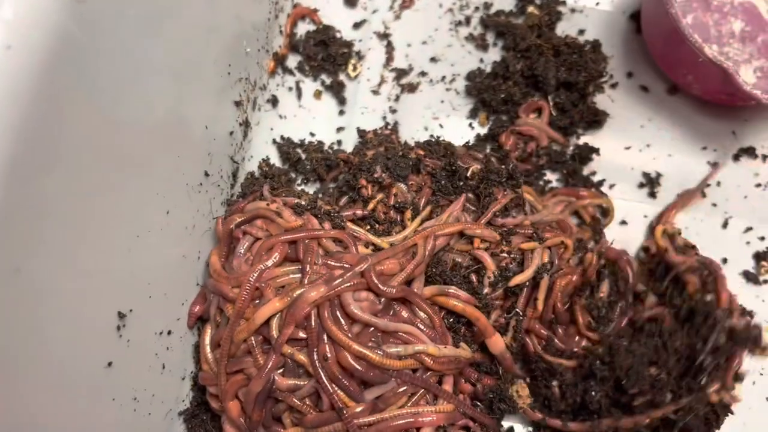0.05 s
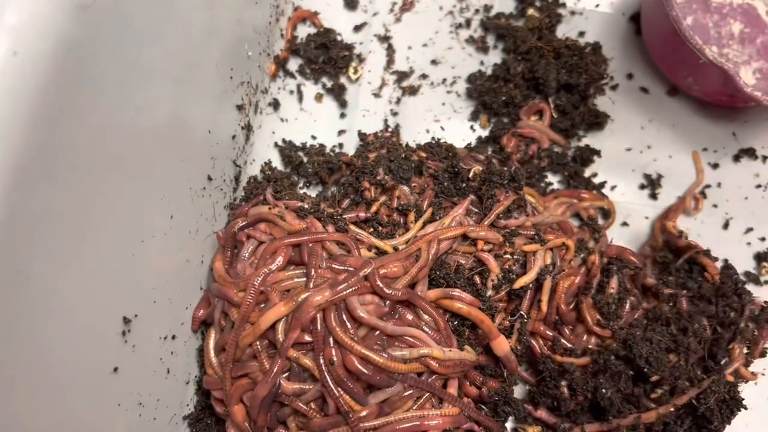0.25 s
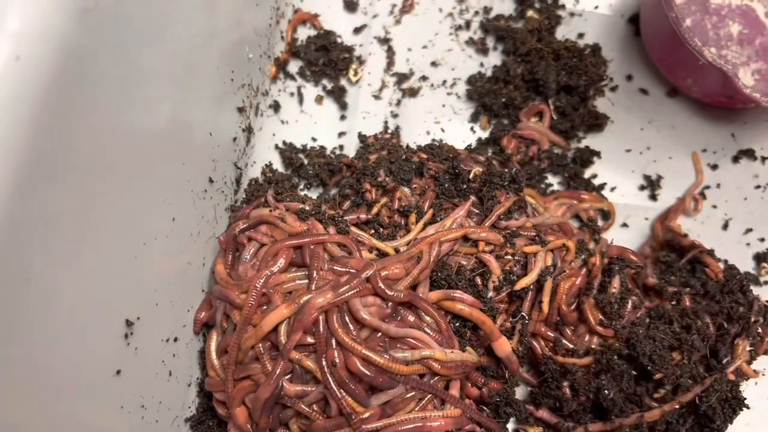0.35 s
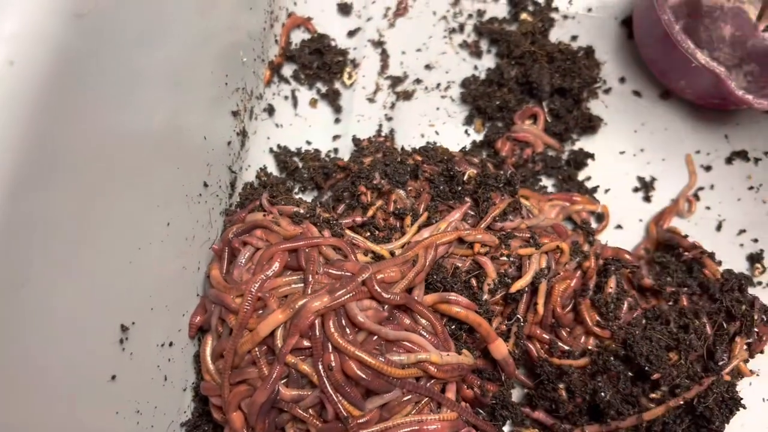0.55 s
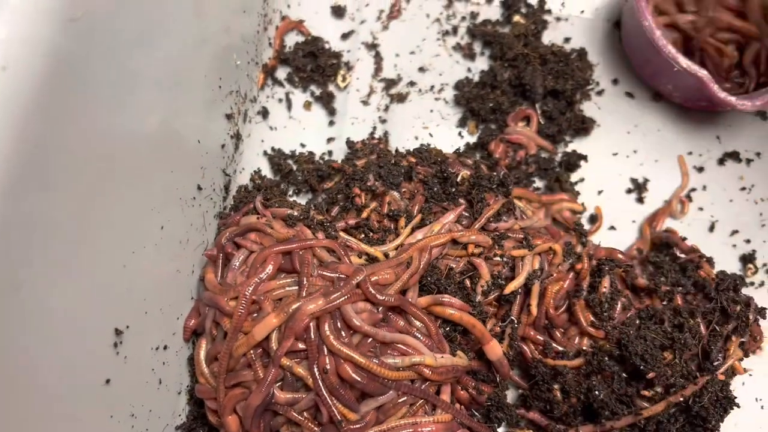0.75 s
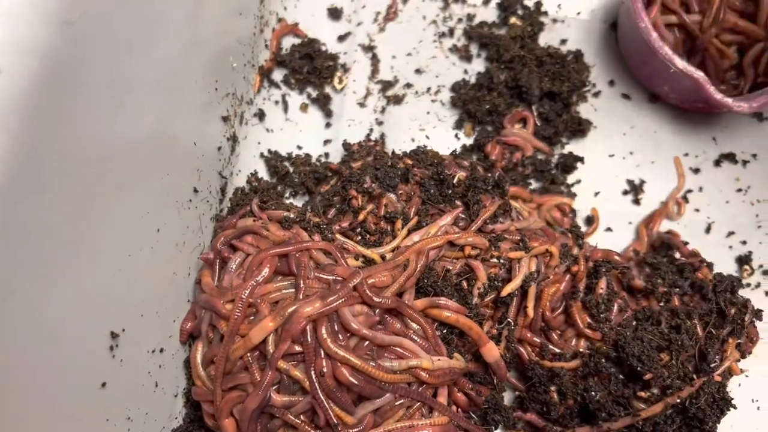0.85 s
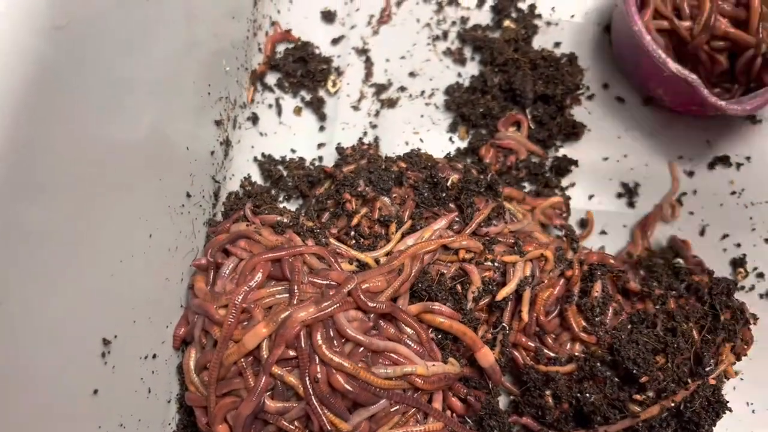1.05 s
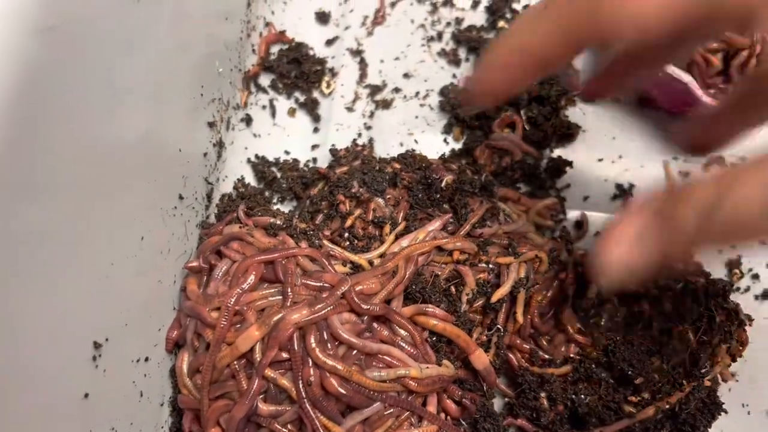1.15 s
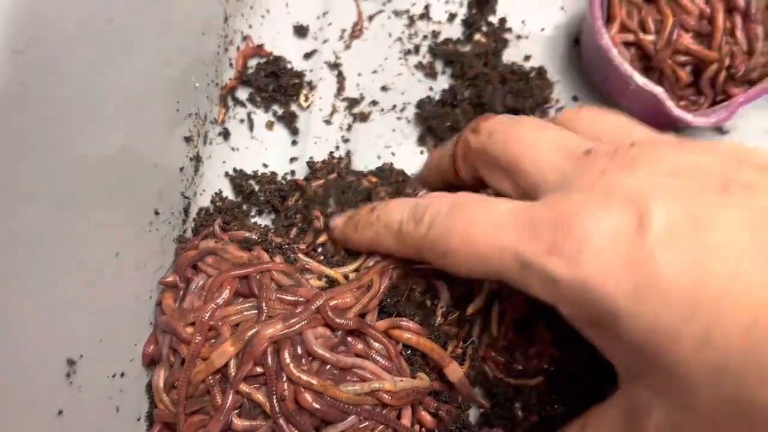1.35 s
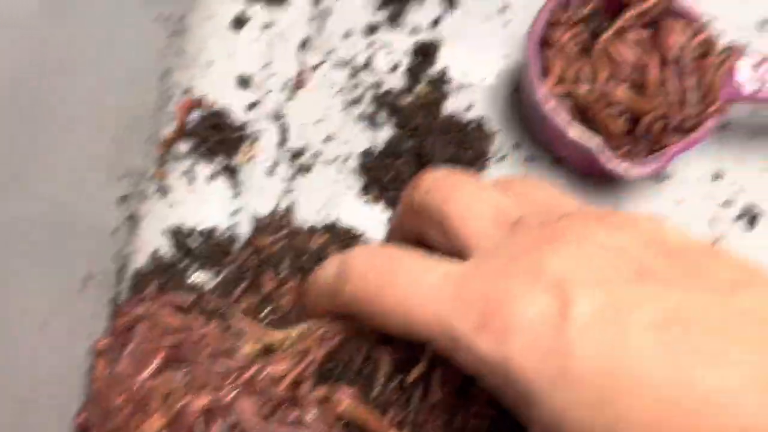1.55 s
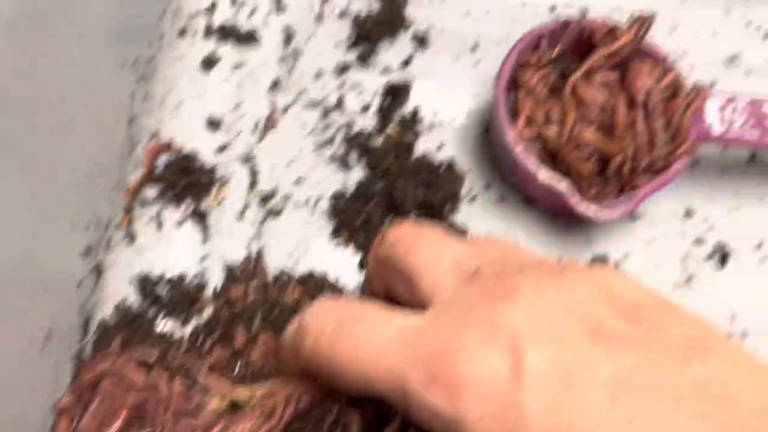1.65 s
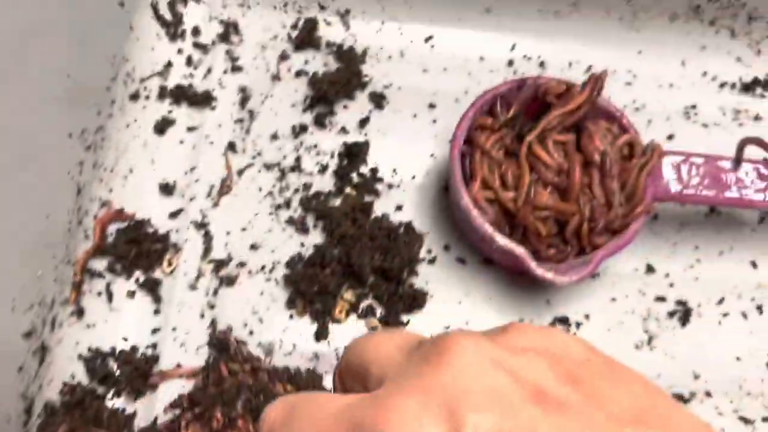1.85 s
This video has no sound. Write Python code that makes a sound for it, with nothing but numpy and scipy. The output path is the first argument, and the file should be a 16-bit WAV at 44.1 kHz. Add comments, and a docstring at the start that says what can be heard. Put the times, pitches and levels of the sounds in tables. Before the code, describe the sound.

Close up in a quiet room, damp clumps thud softly on a plastic tub floor while a scoop clicks and is set down. A hand then presses into worms and bedding, making faint rustles, tiny ticks and a brief squelch.

```python
"""Soft thuds and sharp clicks, then rustling, wet ticks and one rising squelch, close by in a quiet room.
Clumps of worms and damp coir (coconut fibre) drop into a plastic tub and make its floor thud and ring.
A plastic scoop clicks and is set down. Then a hand presses into the pile: the bedding rustles,
wet strands tick as they part, and one pinch squeezes a wet pocket shut, so that its pitch rises."""
import sys
import numpy as np
from scipy import signal
from scipy.fft import rfft, irfft
from scipy.io import wavfile
from scipy.ndimage import uniform_filter1d

SR = 44100
rng = np.random.default_rng(int(sys.argv[2]) if len(sys.argv) > 2 else 0)


def to_wav(s):
    """Save 16-bit WAV."""
    ch = np.atleast_2d(s).T  # columns
    pcm = np.round(np.clip(ch, -1, 1) * 32767)  # PCM
    wavfile.write(sys.argv[1], SR, pcm.astype(np.int16))


N = 83790
TIME, BIN_HZ = np.arange(N) / SR, np.maximum(np.arange(N // 2 + 1) * SR / N, 1)
# tone colour of the high crackle, with two narrow dips in the treble: f/Hz, level/dB
CRACKLE_SPECTRUM = [(2500, -14), (4000, -6.5), (6500, -4.5), (8600, 2.5), (10200, -17.5), (12200, -2),
                    (13800, -19), (15300, -5), (16500, -16)]


def from_db(db):
    """Turn decibels into a factor to multiply by."""
    return 10 ** (np.asarray(db) / 20)


def rms_one(x):
    """Scale a signal so that its average strength (rms) is 1."""
    return x / np.sqrt(np.mean(x ** 2) + 1e-20)


def panned(x, db):
    """Make the left side db decibels louder than the right."""
    return x * from_db([[db / 2], [-db / 2]])


def add(out, start_s, x):
    """Mix x into out, beginning at start_s."""
    i = max(int(start_s * SR), 0)
    out[..., i:i + x.shape[-1]] += x[..., :max(N - i, 0)]


def curve_at(points, hz):
    """Read between a table's points, with the frequencies spaced by octaves."""
    freqs, values = np.transpose(points)
    return np.interp(np.log(hz), np.log(freqs), values)


def coloured(x, spectrum):
    """Give a signal a tone colour; its rms comes out as 1."""
    return rms_one(irfft(rfft(x) * from_db(curve_at(spectrum, BIN_HZ)), N))


def stereo_noise(side_db):
    """White noise; the higher side_db, the wider it sounds."""
    mid, side = rng.standard_normal((2, N))
    return rms_one(mid + from_db(side_db) * side * [[1], [-1]])


def flicker(per_s, depth_db):
    """A gain that glides to a new random level per_s times a second."""
    return from_db(depth_db * np.interp(TIME * per_s, np.arange(N), rng.standard_normal(N)))


def tap_response(spectrum_db):
    """The shortest sound with this spectrum that can follow a tap (minimum phase)."""
    cepstrum = irfft(spectrum_db * np.log(10) / 20)
    half = len(cepstrum) // 2
    cepstrum[1:half] *= 2
    cepstrum[half + 1:] = 0
    return irfft(np.exp(rfft(cepstrum)))


def resonance(hz, width_hz):
    """A filter that rings at one pitch, with gain 1 at its peak."""
    r = np.exp(-np.pi * width_hz / SR)
    return (1 - r * r) / 2 * np.array([1, 0, -1]), [1, -2 * r * np.cos(2 * np.pi * hz / SR), r * r]


def ringing(x, modes):
    """x sets a body's own tones (modes) ringing; each takes t60 seconds to fade by 60 dB."""
    return sum(from_db(db) * signal.lfilter(*resonance(hz, np.log(1000) / np.pi / t60), x + 1e-18)
               for hz, db, t60 in modes)


def hump_db(hz, centre_hz, width_oct):
    """A rounded hill in the spectrum around one frequency."""
    return -10 * np.log10(1 + (np.log2(hz / centre_hz) / width_oct) ** 4)


def burst(db, spectrum_db, envelope):
    """Many tiny contacts blur into one click; db sets its loudest half millisecond."""
    contacts = rng.standard_normal(len(envelope)) * envelope
    click = signal.fftconvolve(contacts, tap_response(spectrum_db))
    return click * from_db(db) / np.sqrt(2 * uniform_filter1d(click ** 2, size=22).max())


def room_echo(x, t60=0.27):
    """The room's reflections make a short tail, different in each ear."""
    t = TIME[:SR // 2]
    tail = rng.standard_normal((2, len(t))) * from_db(-60 * t / t60) * (t > .005)
    tail /= np.sqrt(np.sum(tail ** 2) / 2)
    return signal.fftconvolve(np.atleast_2d(x), tail, axes=1)[:, :N]


def out_of_step(x):
    """Left and right are set out of step with each other, most in the mids and treble."""
    # how far the left side leads the right: f/Hz, phase/rad
    phase_lead = [(60, .15), (380, .35), (700, 1.0), (1200, 2.3), (2400, 1.5), (4400, 1.15), (15000, 1.4)]
    return irfft(rfft(x) * np.exp(.5j * curve_at(phase_lead, BIN_HZ) * [[1], [-1]]), N)


def quiet_room():
    """A faint, steady rumble lies under everything."""
    # tone colour of the rumble: f/Hz, level/dB
    spectrum = [(20, -12.5), (52, 5.5), (90, -1.5), (200, -7), (450, -17.5), (1000, -21.5), (3000, -27),
                (8000, -31.5), (16000, -63)]
    return from_db(-71.5) * coloured(stereo_noise(side_db=-9.5), spectrum)


def hand_press(peak_s=1.338, width_s=0.015, hz=56):
    """The hand's weight flexes the tub floor in one low swell."""
    swell = np.exp(-((TIME - peak_s) / width_s) ** 2)
    return from_db(-48.5) * swell * np.sin(2 * np.pi * hz * TIME)


def finger_brush(peak_s=1.742, width_s=0.048):
    """Fingers brush through the fibres with a soft swell of hiss."""
    # tone colour of the brushing: f/Hz, level/dB
    spectrum = [(1500, -25), (2600, 1.5), (3400, 4), (4300, -4), (7000, -41)]
    swell = np.exp(-((TIME - peak_s) / width_s) ** 2)
    return from_db(-58.5) * swell * coloured(stereo_noise(side_db=-3), spectrum)


def crumb_pops(pitch_count=12, base_per_s=600, spread_db=11.5, sharpness=12):
    """Moist crumbs pop in loose clusters, each at one of a set of high pitches."""
    sizes = from_db(spread_db * np.minimum(rng.exponential(1, N), 2.5)) * rng.choice([-1, 1], N)
    chance = flicker(per_s=110, depth_db=4) * base_per_s / SR
    kicks = sizes * (rng.random(N) < chance)
    kicks = kicks * from_db(rng.normal(0, 1.923, N) * [[1], [-1]])  # scatter left and right
    pitch_index = rng.integers(0, pitch_count, N)
    pops = sum(signal.lfilter(*resonance(hz, hz / sharpness), kicks * (pitch_index == k) + 1e-18)
               for k, hz in enumerate(np.geomspace(2500, 15000, pitch_count)))
    return coloured(pops, CRACKLE_SPECTRUM)


def bedding_rustle():
    """Crumbs crackle, fibres grip and rub, and the pile shifts with a muffled sound."""
    # course of the rustle: t/s, crackle level/dB, rubbing level/dB, shifting level/dB
    levels = [(0, -77, -74.5, -72.5), (.16, -75, -72, -74.5), (.38, -70, -67.5, -52),
              (0.539, -68, -80.5, -63.5), (.58, -65.5, -69, -69), (0.642, -68, -69, -61.5),
              (0.702, -54.5, -48.5, -36), (0.757, -73.5, -58, -58), (.83, -79, -71.5, -48),
              (.95, -81, -81, -76.5), (1.229, -79, -75, -78), (1.25, -76.5, -67, -53),
              (1.43, -70.5, -69, -68), (1.62, -70, -61, -76), (1.75, -60, -59.5, -61.5),
              (1.81, -63, -60.5, -72), (1.85, -65.5, -56, -71), (1.9, -57.5, -56.5, -69)]
    # tone colours of the rubbing and the shifting: f/Hz, level/dB
    rub_spectrum = [(300, 11), (600, 9), (900, 12.5), (1250, 2.5), (1700, 7.5), (2400, -1), (3300, 0),
                    (5000, -6), (9000, -49)]
    shift_spectrum = [(30, -4.5), (60, 0.5), (130, 8.5), (200, -5.5), (310, 8.5), (500, -19.5), (800, -26),
                      (1500, -52), (4000, -68)]
    times, *columns = np.transpose(levels)
    treble, mids, lows = [from_db(np.interp(TIME, times, column)) for column in columns]
    crackle = from_db(-3) * crumb_pops()
    crackle += from_db(-1) * coloured(stereo_noise(side_db=-1.5), CRACKLE_SPECTRUM)
    grip = rms_one(flicker(per_s=130, depth_db=3.5))
    rubbing = grip * coloured(stereo_noise(side_db=-4.5), rub_spectrum)
    shifting = coloured(stereo_noise(side_db=-19.5), shift_spectrum)
    return treble * crackle + mids * rubbing + lows * shifting


def squelch(block=64):
    """Uneven wet slips rasp and ring a pocket, whose pitch rises as it is squeezed shut."""
    # course of the pinch: t/s, pocket f/Hz, resonance width/Hz, pocket level/dB, rasp level/dB
    pinch = [(1.509, 835, 350, -85, -97), (1.512, 800, 243, -59, -84), (1.543, 825, 267, -53, -86),
             (1.551, 1110, 596, -69, -82), (1.561, 1560, 402, -61.5, -70), (1.572, 1580, 200, -48.5, -66),
             (1.581, 2074, 50, -53, -48.5), (1.592, 2128, 30, -49, -53), (1.618, 2110, 30, -54.5, -67),
             (1.644, 2100, 50, -76, -77)]
    # tone colour of the rasp: f/Hz, level/dB
    rasp_spectrum = [(1000, -57), (1600, 16), (2400, -35), (2700, 18), (3300, 2), (4500, 0), (8000, -30)]
    times, *columns = np.transpose(pinch)
    hz, width_hz, pocket_db, rasp_db = [np.interp(TIME, times, column) for column in columns]
    slips = rms_one(flicker(per_s=250, depth_db=2.5)) * stereo_noise(side_db=-4)
    pocket, state = np.zeros((2, N)), np.zeros((2, 2))
    for i in range(int(times[0] * SR), int(times[-1] * SR), block):
        drive = slips[:, i:i + block] * np.sqrt(SR / np.pi / width_hz[i])  # equally strong at any width
        pocket[:, i:i + block], state = signal.lfilter(*resonance(hz[i], width_hz[i]), drive, zi=state)
    pinching = (TIME > times[0]) & (TIME < times[-1])
    rasp = from_db(rasp_db) * coloured(slips, rasp_spectrum) * pinching
    return panned(pocket * from_db(pocket_db) + rasp, db=2.5)


def wet_ticks(t60=.006):
    """Wet strands part with tiny, high ticks."""
    # strands parting: t/s, level/dB, brightest f/Hz
    partings = [(.0408, -53.5, 8100), (.136, -60, 4240), (.181, -66, 7900), (0.245, -47.5, 7300),
                (.285, -49, 7600), (0.321, -47, 7800), (0.3708, -44.5, 6560), (0.393, -79, 7450),
                (0.41, -41.5, 6440), (.415, -105, 5500), (0.475, -42, 10200), (0.5523, -35, 9000),
                (.6928, -68, 8900), (0.707, -44.5, 12200), (0.7309, -54, 8550), (0.744, -63, 8550),
                (0.864, -70, 8000), (0.9197, -55, 8160), (1.036, -58, 7800), (1.065, -55.5, 5400),
                (1.427, -49, 10900), (1.514, -76, 10000), (1.6616, -33.5, 14200), (1.672, -46, 8000),
                (1.78, -40.5, 8550), (1.8079, -44.5, 8400), (1.865, -37.5, 9000)]
    hz = np.maximum(np.fft.rfftfreq(1024, 1 / SR), 1)
    fade = from_db(-60 * TIME[:SR // 10] / t60)
    ticks = np.zeros((2, N))
    for start_s, db, bright_hz in partings:
        tick = burst(db, hump_db(hz, bright_hz, width_oct=.3), fade)
        add(ticks, start_s, panned(tick, db=.7))
    return ticks


def scoop_knocks(tail_db=-25, tail_t60=0.092):
    """The hard plastic scoop clicks at each contact and rings briefly."""
    # contacts: t/s, level/dB, emphasis f/Hz, emphasis width/octaves, t60/s, pan/dB
    contacts = [(0.018, -53, 1300, 0.59, 0.06, 9.5), (0.1946, -28, 1500, 0.81, 0.024, 4),
                (0.2048, -36, 3780, 0.49, .014, 3), (0.2089, -47, 5360, 0.41, 0.015, 1),
                (0.5538, -30, 3960, 0.6, 0.016, 2.5), (0.666, -44.5, 1900, .9, 0.021, 6.5),
                (.6915, -37, 3500, 0.95, .03, 2.5), (0.7276, -45.5, 4150, 0.48, 0.02, 2),
                (0.73, -32, 3000, 1.01, 0.017, 2), (0.7438, -39.5, 2570, 1.1, 0.032, -3),
                (0.7565, -46.5, 4500, 0.2, 0.018, 9), (0.7935, -36.5, 4540, 0.33, 0.0083, 5.5),
                (0.8738, -53, 5200, 0.44, 0.014, 6), (1.5138, -52, 920, 0.24, .03, 7),
                (1.584, -41, 2900, 0.19, 0.016, -1), (1.8443, -47.5, 1980, 3.6, 0.018, 10)]
    # tone colour of the clicks, with a dip near 10 kHz: f/Hz, level/dB
    click_spectrum = [(400, -16), (1100, 17.5), (1700, 9.5), (2300, 7.5), (2650, -3.5), (3300, 1),
                      (5000, -1.5), (6300, -6.5), (8700, 6), (10200, -15), (15500, -6.5)]
    # the scoop's own tones: f/Hz, level/dB, t60/s
    modes = [(1668, 3.5, .1), (2187, 2.5, 0.086), (3175, -0.5, .07), (4660, -4.5, .12)]
    hz, t = np.maximum(np.fft.rfftfreq(1024, 1 / SR), 1), TIME[:SR // 10]
    knocks = np.zeros((2, N))
    for start_s, db, bright_hz, width_oct, t60, pan_db in contacts:
        fade = from_db(-60 * t / t60) + from_db(tail_db - 60 * t / tail_t60)
        spectrum_db = curve_at(click_spectrum, hz) + hump_db(hz, bright_hz, width_oct)
        add(knocks, start_s, panned(burst(db, spectrum_db, fade), pan_db))
    return knocks + ringing(knocks, modes)


def tub_thuds(size=4096, travel_s_at_500_hz=0.0049, lead_s=.0026):
    """Each soft blow sends a bending wave across the tub floor, highs first, and sets it ringing."""
    # blows on the floor: t/s, level/dB, upper edge f/Hz, lower edge f/Hz, relative ring level/dB
    blows = [(0.0207, -38, 481, 250, -9.5), (.040, -81.5, 278, 101, 41), (.066, -52, 670, 196, 5),
             (.2040, -17, 670, 230, -3), (0.2063, -12.5, 333, 200, -3.5), (0.228, -31, 450, 102, -23),
             (0.3355, -16.5, 568, 194, -4), (0.4379, -36.5, 380, 570, 3), (0.4722, -37, 337, 590, -2),
             (0.509, -50, 330, 590, 3), (0.551, -49, 370, 235, -23), (.654, -44.5, 290, 169, -18),
             (0.691, -23, 560, 176, 0.5), (.701, -39, 484, 230, 4), (0.7307, -26.5, 765, 380, 13.5),
             (0.7432, -19, 704, 306, -29), (0.7537, -28, 664, 302, -5), (0.7985, -30, 694, 423, 3.5),
             (.874, -52.5, 700, 300, 3), (1.240, -54, 810, 255.4, -19), (1.248, -52, 550, 257.5, 13),
             (1.261, -51.5, 550, 256, -23), (1.31, -51, 450, 175, -2), (1.38, -58, 400, 220, 1.5),
             (1.785, -44, 450, 277, -19)]
    # the wave bounces back from the tub walls: delay/s, level/dB
    wall_echoes = [(.0042, -14.5), (.0085, -11), (0.0136, -8.5)]
    # the floor's own tones: f/Hz, level/dB, t60/s
    modes = [(54, 12.5, 0.15), (132, 7, 0.19), (230, 2, 0.138), (358.6, 1.5, 0.13), (450, -5.5, 0.16),
             (560, -6.5, 0.15), (650, -25, .13), (757.7, 2.5, 0.065), (997, -14, 0.26), (1147, 6, .13),
             (1397, 11.5, 0.065)]
    hz = np.maximum(np.fft.rfftfreq(size, 1 / SR), 1)
    travel = np.exp(-4j * np.pi * travel_s_at_500_hz * np.sqrt(500 * hz))
    direct, drive = np.zeros((2, N))
    for time_s, db, upper_hz, lower_hz, ring_db in blows:
        treble_cut = 1 / np.sqrt(1 + (hz / upper_hz) ** 10)
        bass_cut = hz ** 2 / (hz ** 2 + lower_hz ** 2)
        wave = irfft(treble_cut * bass_cut * travel) * signal.windows.tukey(size, .03)
        wave *= from_db(db) / np.abs(wave).max()
        start_s = time_s - lead_s  # contact comes just before the wave is first heard
        add(direct, start_s, wave)
        for delay_s, echo_db in wall_echoes:
            add(direct, start_s + delay_s, wave * from_db(echo_db))
        add(drive, start_s, wave * from_db(ring_db))
    return direct + ringing(drive, modes)


def scene():
    """Thuds and clicks with their echoes, plus the sounds of the pile, over the quiet room."""
    thuds = tub_thuds()
    thuds = panned(thuds, db=-2) + from_db(-25) * room_echo(thuds)
    clicks = scoop_knocks() + wet_ticks()
    clicks += from_db(-17.5) * room_echo(clicks)
    pile = bedding_rustle() + finger_brush() + hand_press() + squelch()
    return out_of_step(thuds + clicks) + pile + quiet_room()


def record(dry):
    """A steep filter cuts off the treble above 16400 Hz."""
    return signal.sosfilt(signal.ellip(10, .2, 80, 16400, fs=SR, output="sos"), dry)


dry = scene()
out = record(dry)
to_wav(out)
```